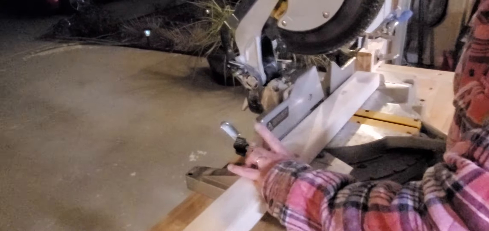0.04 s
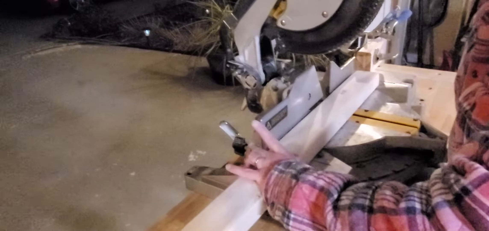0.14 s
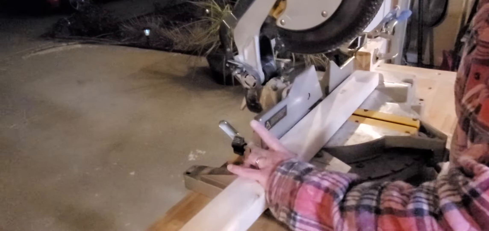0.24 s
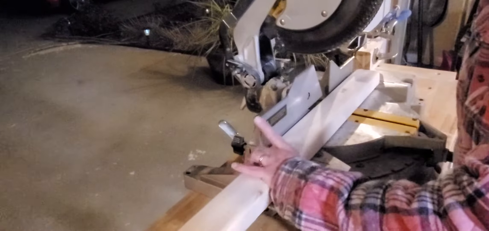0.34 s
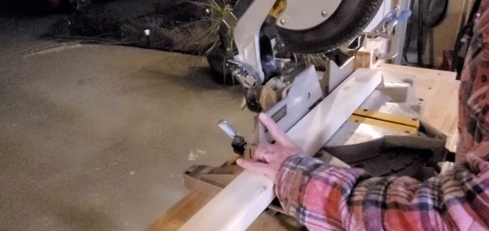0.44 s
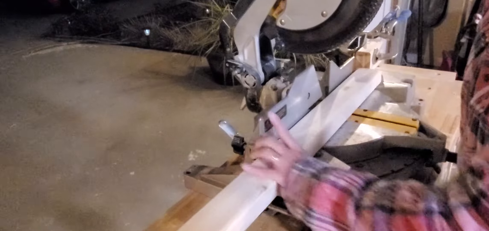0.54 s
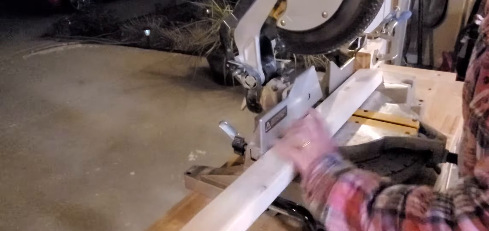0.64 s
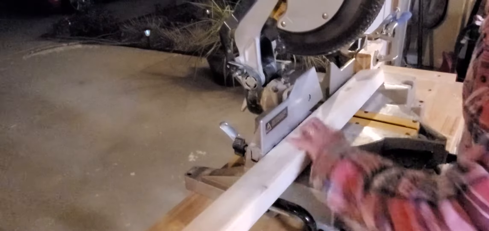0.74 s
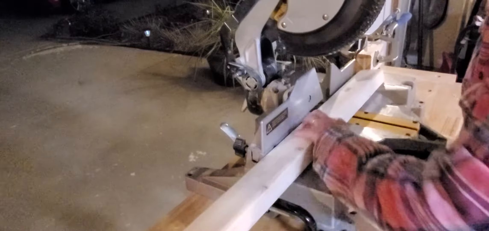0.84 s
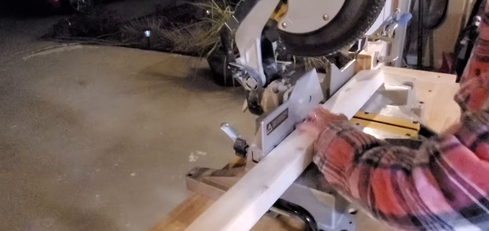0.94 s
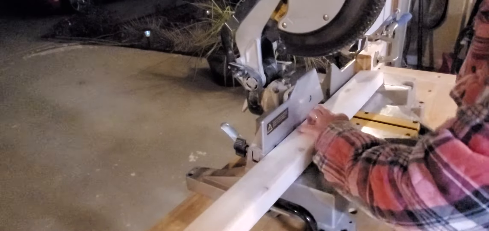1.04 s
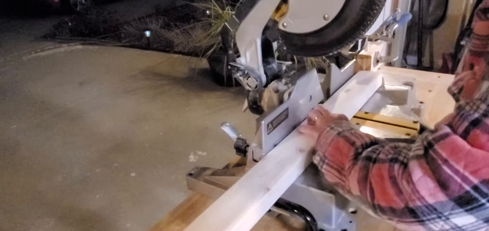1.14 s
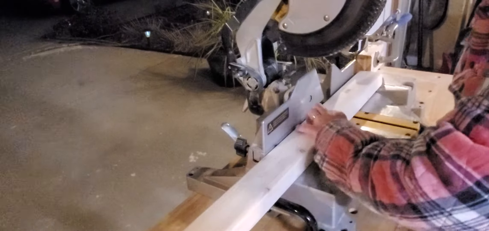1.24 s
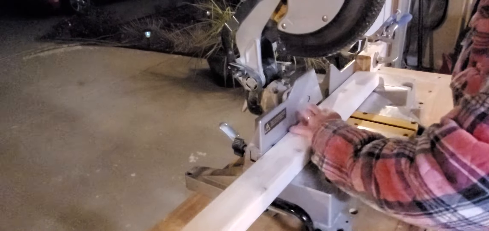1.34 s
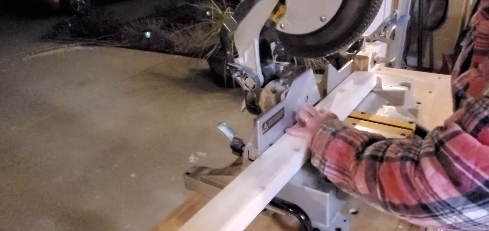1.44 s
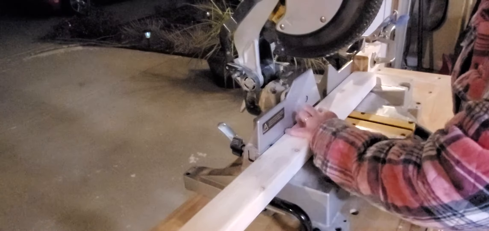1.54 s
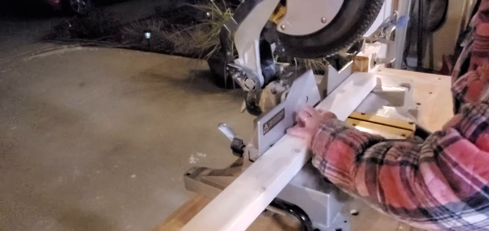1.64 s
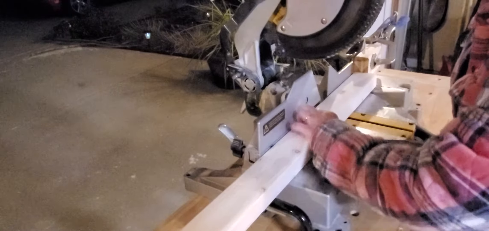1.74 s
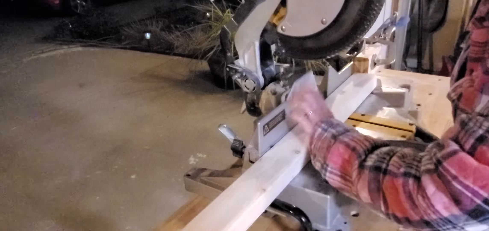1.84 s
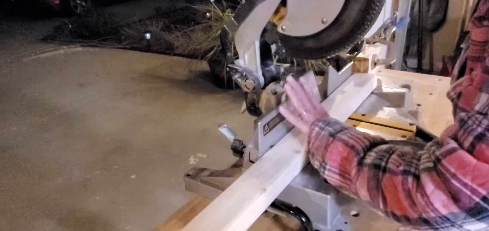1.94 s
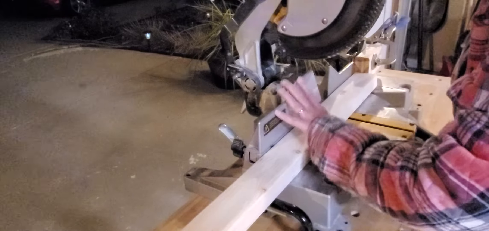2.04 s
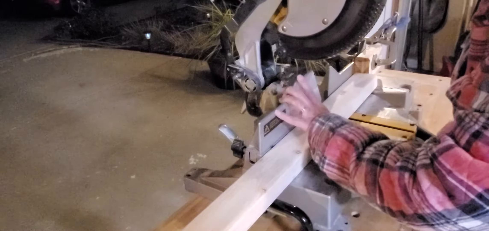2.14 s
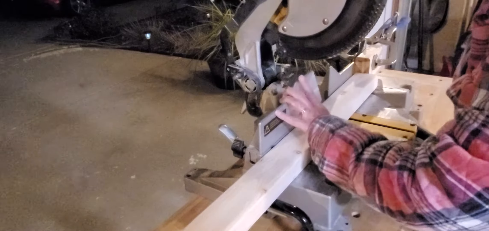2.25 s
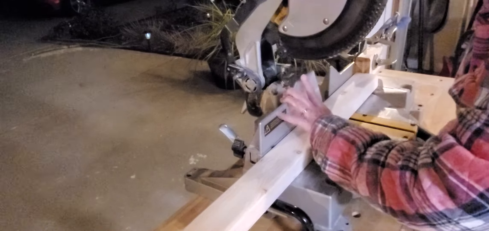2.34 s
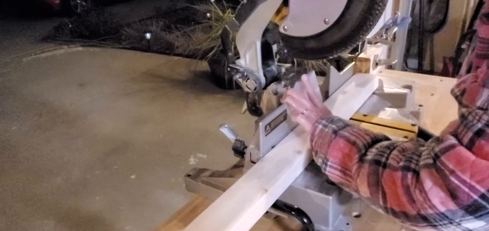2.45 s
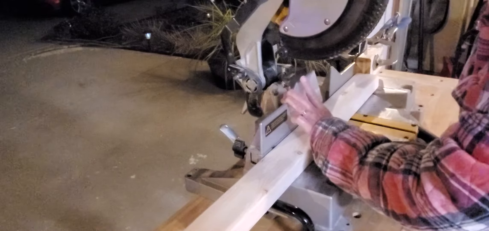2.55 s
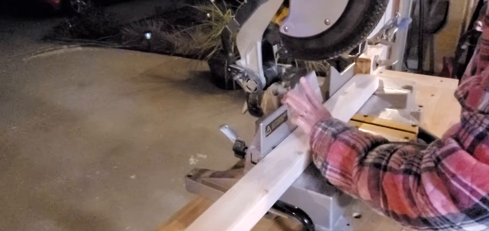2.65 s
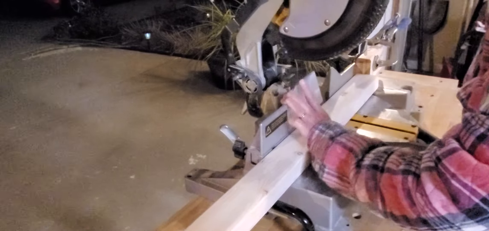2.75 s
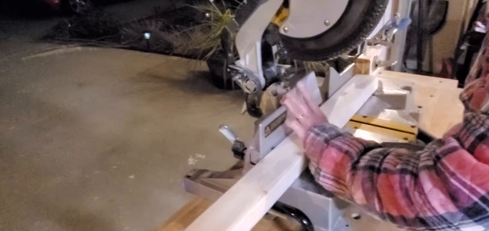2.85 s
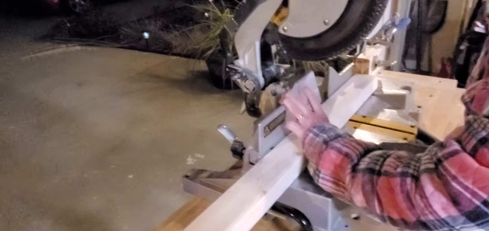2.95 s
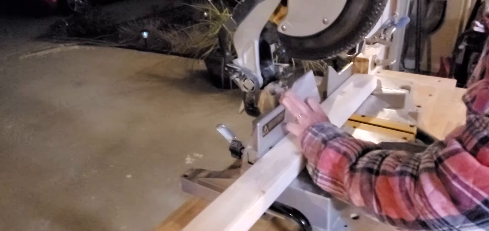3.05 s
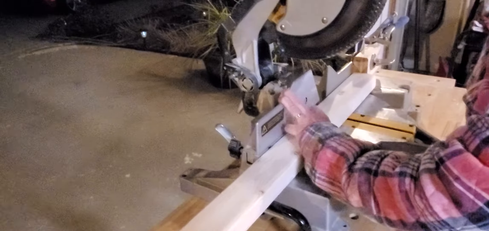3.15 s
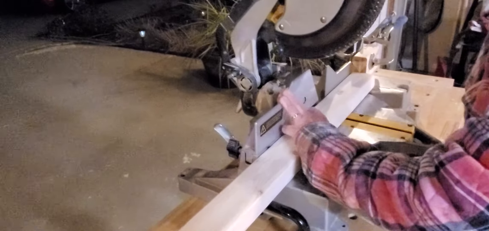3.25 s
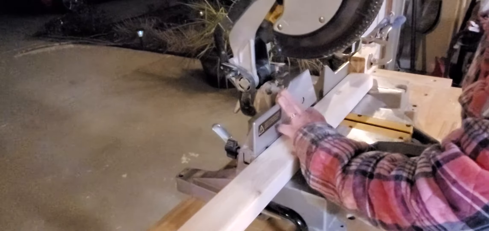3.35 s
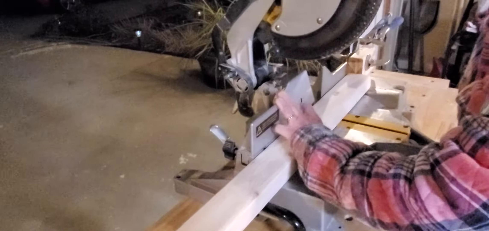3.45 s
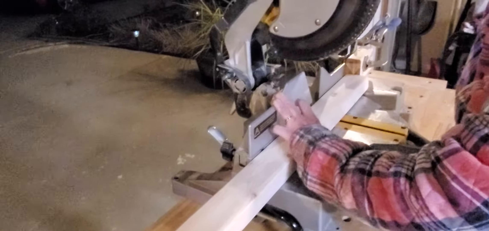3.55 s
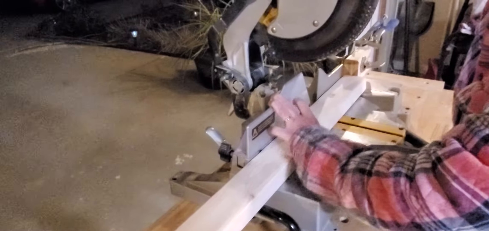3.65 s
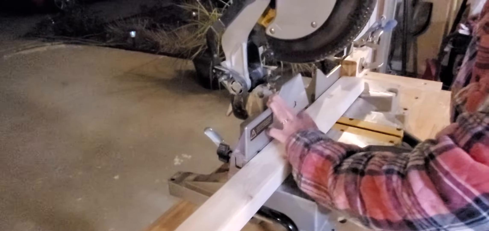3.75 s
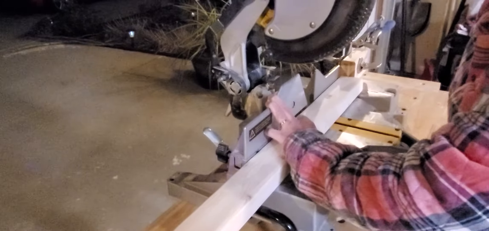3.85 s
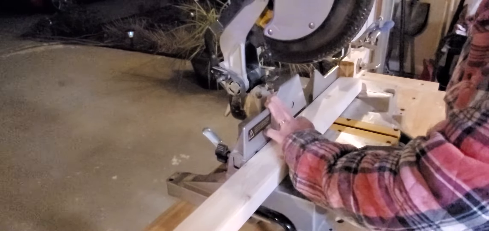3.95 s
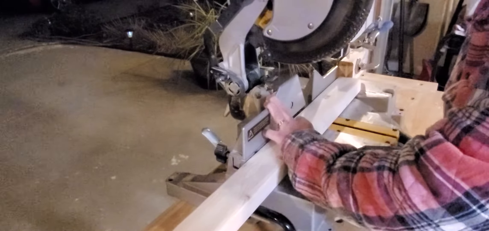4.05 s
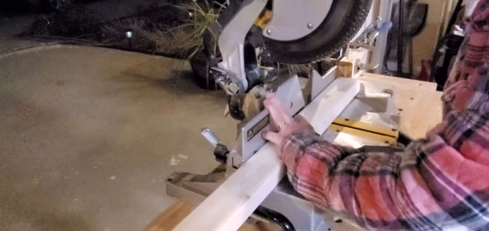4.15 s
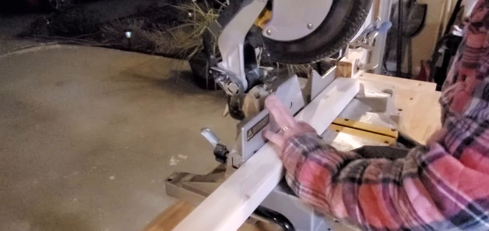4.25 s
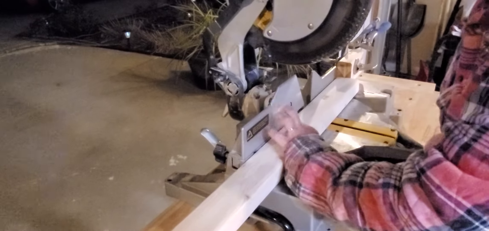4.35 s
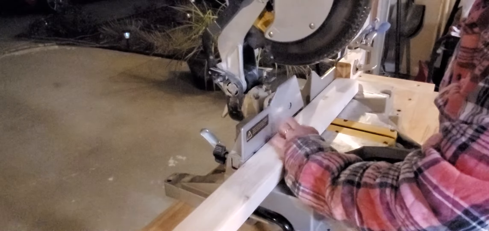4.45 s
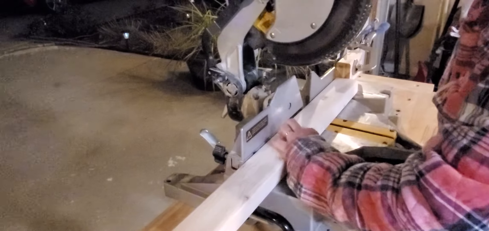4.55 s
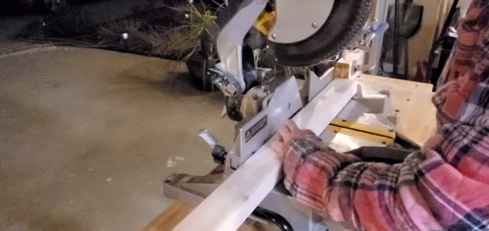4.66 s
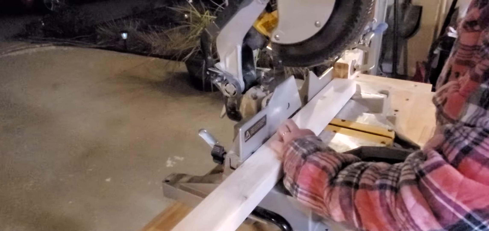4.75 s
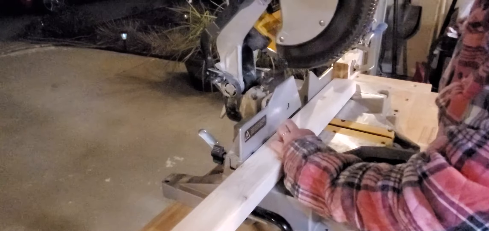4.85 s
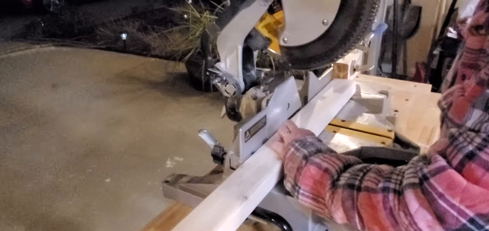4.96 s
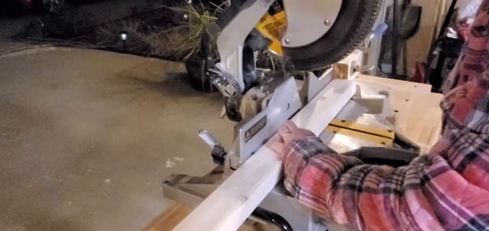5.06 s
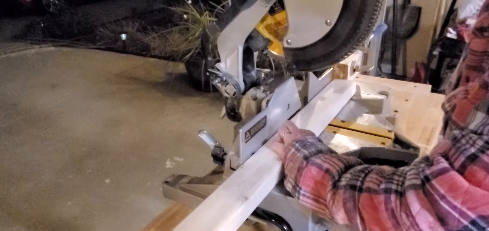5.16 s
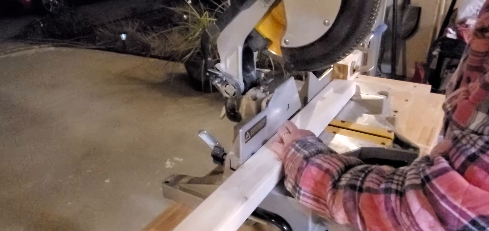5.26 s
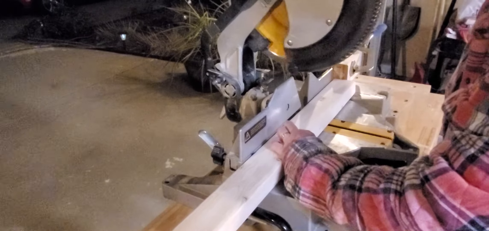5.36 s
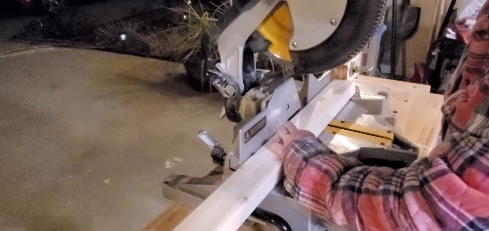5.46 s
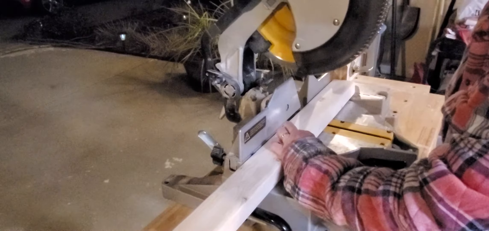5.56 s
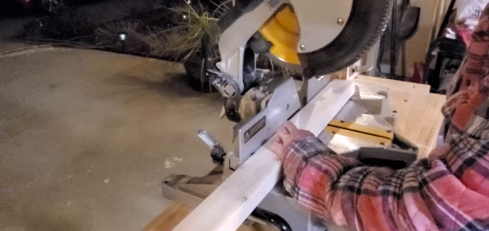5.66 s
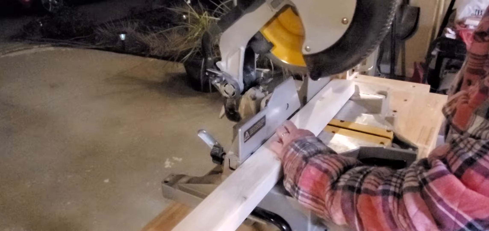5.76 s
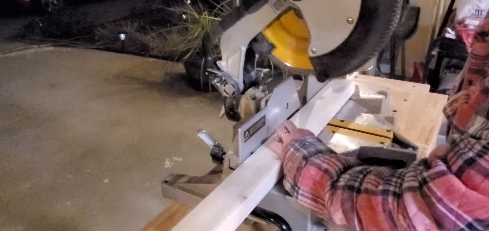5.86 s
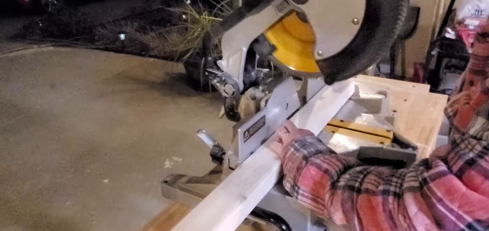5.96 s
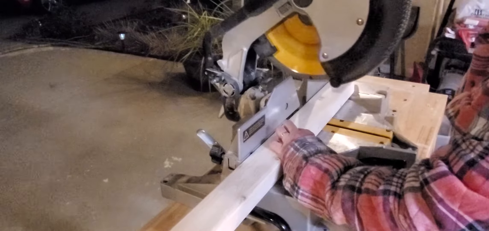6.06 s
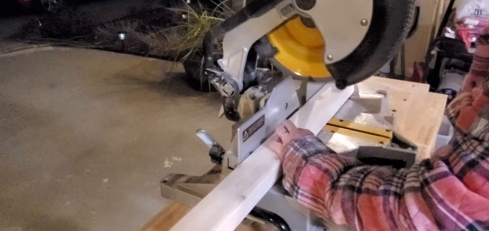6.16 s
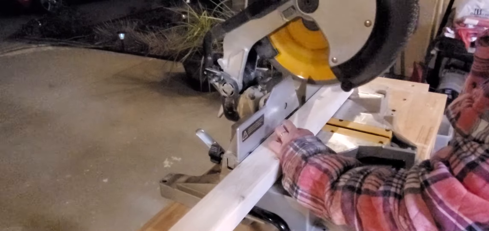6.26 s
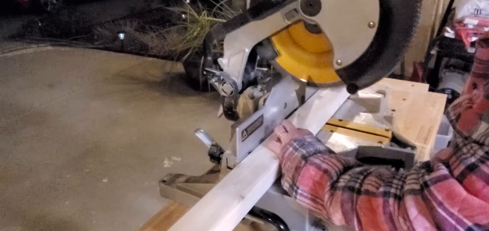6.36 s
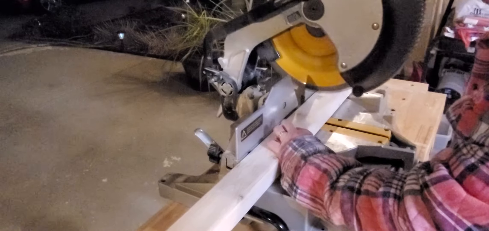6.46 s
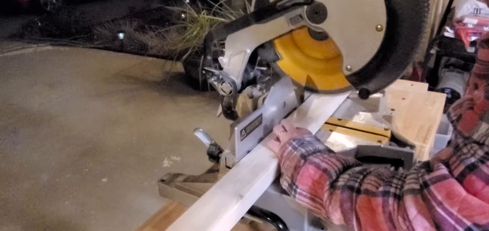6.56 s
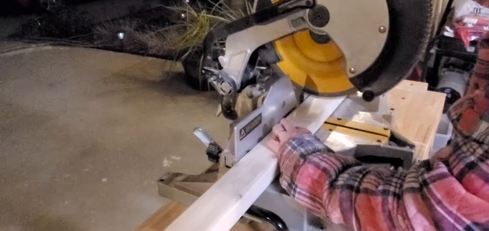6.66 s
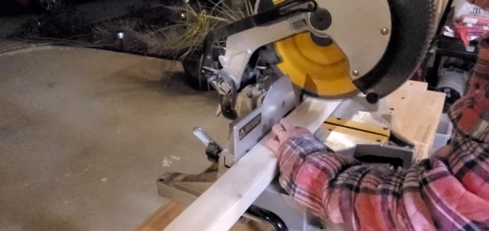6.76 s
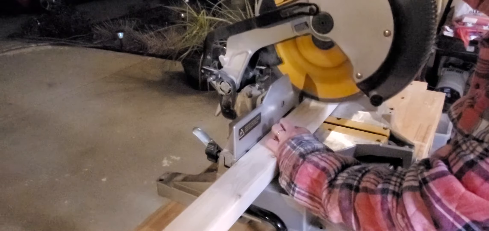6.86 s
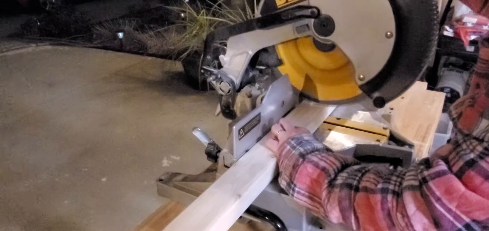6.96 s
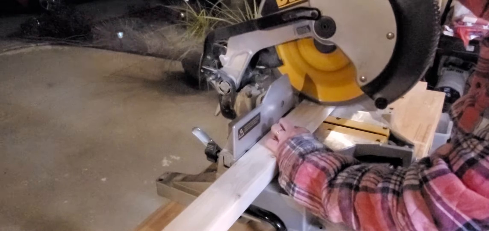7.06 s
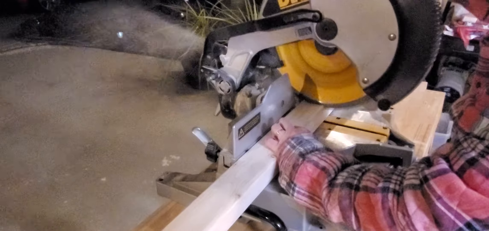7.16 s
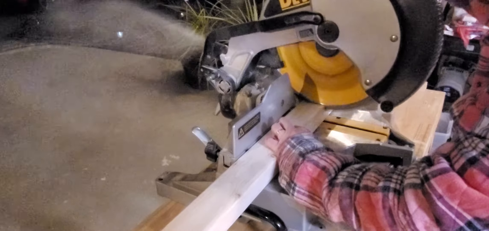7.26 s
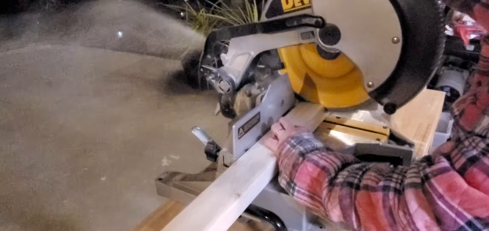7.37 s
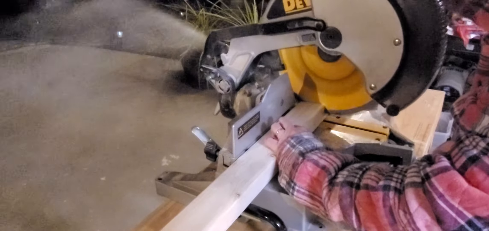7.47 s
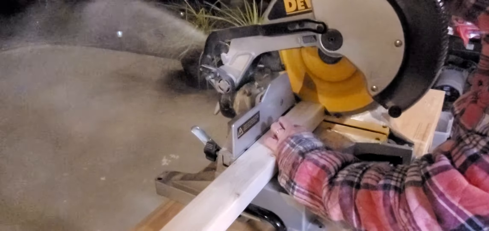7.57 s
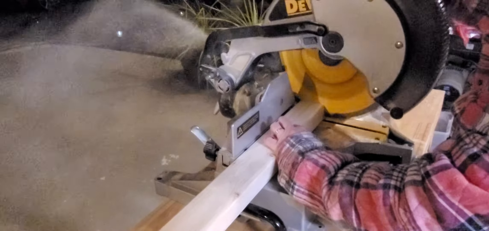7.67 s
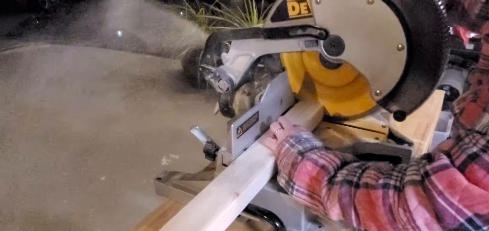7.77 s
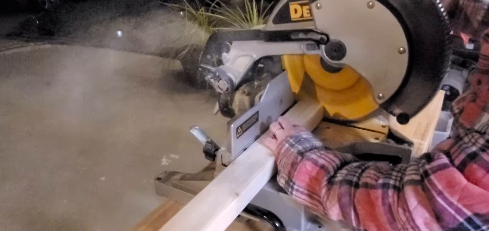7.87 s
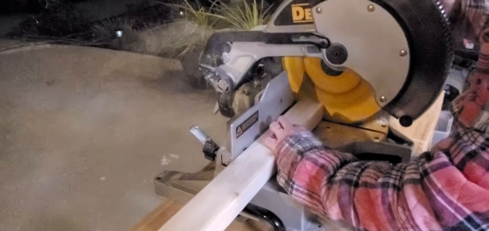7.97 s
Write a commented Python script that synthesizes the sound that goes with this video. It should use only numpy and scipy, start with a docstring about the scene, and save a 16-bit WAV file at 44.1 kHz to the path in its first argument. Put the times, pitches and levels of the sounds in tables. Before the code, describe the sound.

Close stereo sound in a small workshop: short woody squeaks, rumbling slides and a sharp cluster of board knocks, then faint ticks and soft rustles over low room tone. A distant blower comes on, and soon an electric saw starts abruptly with buzz and rattle, spins up to a high whine and strong rush, then sags under load as the blade slowly cuts, its bright tearing hiss leaning to the right.

```python
"""In a workshop, before two microphones, a board sticks and slips squeaking across a miter saw's table.
It rubs and knocks against fence and table, among clacks, ticks, bumps and rustles of noise and ringing modes.
A blower, muffled noise some way off, swells up; then the saw kicks in with mains buzz, rattle and sparks.
It spins up with a rising fan whine and a rush of air, then the teeth bite slowly into the wood:
strikes of noise ring the steel blade and the load drags down the motor's speed."""
import sys
import numpy as np
from scipy import signal
from scipy.fft import rfft, irfft
from scipy.io import wavfile

SR = 44100
rng = np.random.default_rng(int(sys.argv[2]) if len(sys.argv) > 2 else 0)


def transcribe(signal):
    """Save signal, clipped to [-1, 1], as a 16-bit WAV file at the path in sys.argv[1]."""
    frames = np.atleast_2d(signal).T
    limited = np.clip(frames, -1, 1)
    pcm = np.round(limited * 32767).astype(np.int16)
    wavfile.write(sys.argv[1], SR, pcm)


N = 354123
T = np.arange(N) / SR
FREQS = np.fft.rfftfreq(N, 1 / SR)


def undb(db):
    """Decibels to gain."""
    return 10 ** (np.asarray(db) / 20)


def unit(x):
    """Scale to rms 1."""
    return x / np.sqrt(np.mean(x ** 2) + 1e-20)


def gate(start, end, fade=0.012):
    """Open between two times, with short fades (in seconds) outside them."""
    return np.clip(1 + np.minimum(T - start, end - T) / fade, 0, 1)


def bell(x, centre, width):
    """A smooth hump of height 1, down to 1/e one width either side of its centre."""
    return np.exp(-((x - centre) / width) ** 2)


def fall(t, t60):
    """Exponential decay by 60 dB in t60 seconds."""
    return np.exp(-np.log(1000) * t / t60)


def envelope(start, rise_s, hold_s, t60):
    """Rise to 1 by the start time, hold, then die away."""
    rise = np.exp(-(np.maximum(start - T, 0) / rise_s) ** 2)
    return rise * fall(np.maximum(T - start - hold_s, 0), t60)


def by_hz(table, freqs=FREQS):
    """A (Hz, value) table joined on a log-frequency axis."""
    hz, value = np.transpose(table)
    return np.interp(np.log(freqs + 1), np.log(hz), value)


def colour(x, table):
    """Give a sound a (Hz, dB) spectrum that falls off beyond the table's ends; rms 1."""
    f = np.fft.rfftfreq(x.shape[-1], 1 / SR) + 1
    low_skirt = 1 + (table[0][0] / f / 1.1) ** 8
    high_skirt = 1 + (f / table[-1][0] / 1.1) ** 8
    response = undb(by_hz(table, f)) / np.sqrt(low_skirt * high_skirt)
    return unit(irfft(rfft(x) * response, x.shape[-1]))


def resonate(x, modes):
    """Pass a sound through (Hz, width Hz, dB) resonances; rms 1."""
    f = np.fft.rfftfreq(x.shape[-1], 1 / SR) + 1
    response = sum(undb(db) / (1 + 1j * (f * f - hz * hz) / (f * width)) for hz, width, db in modes)
    return unit(irfft(rfft(x) * response, x.shape[-1]))


# How alike diffuse sound is at the two microphones.
# Each row: frequency in Hz, left-right correlation (0-1).
LIKENESS = [(60, .99), (300, 1), (640, 1), (1400, 0.93), (3000, 0.083), (15000, 0.08)]


def noise(size=N):
    """Diffuse stereo noise: the bass is alike at both microphones, the treble nearly unrelated."""
    alike = np.clip(by_hz(LIKENESS, np.fft.rfftfreq(size, 1 / SR)), 0, 1)
    mid, side = rfft(rng.standard_normal((2, size))) * np.sqrt([1 + alike, 1 - alike])
    return unit(irfft(np.array([mid + side, mid - side]), size))


def walk(rate):
    """Smooth random wander with spread 1, slower than about the rate in Hz."""
    return unit(irfft(rfft(rng.standard_normal(N)) / (1 + (FREQS / rate) ** 4), N))


def turn(hz):
    """Phase in radians of a moving frequency."""
    return 2 * np.pi * np.cumsum(hz) / SR


def add(out, s, sound, db):
    """Mix in a short sound at a time in seconds and a peak level in dB."""
    i = int(s * SR)
    out[:, i:i + sound.shape[-1]] += undb(db) * sound / np.abs(sound).max()


def room(x, wet_db, t60=.5):
    """Direct sound plus the workshop's diffuse tail."""
    t = T[:SR // 2]
    tail = noise(size=len(t)) * fall(t, t60) * np.minimum(t / .012, 1)
    tail = unit(tail) / np.sqrt(len(t))
    return x + undb(wet_db) * signal.fftconvolve(x, tail, axes=1)[:, :N]


# Spectrum of the quiet workshop air. Each row: frequency in Hz, relative level in dB.
ROOM_TONE = [(15, -59), (25, -19.5), (64, -8), (123, -8.5), (152, -20), (241, -16), (333, -20.5),
             (461, -7.5), (620, -21), (812, -16.5), (1120, -28), (2090, -25.5), (2520, -38), (2970, -33),
             (15800, -43.5)]
# Faint hum in the room. Each row: frequency in Hz, mean amplitude in dB.
ROOM_HUM = [(118, -77), (236, -77), (467, -81)]
ROOM_DB = -66


def room_tone():
    """Quiet workshop air is coloured noise, with a faint hum of wavering sines."""
    hum = sum(undb(db + 2 * walk(3)) * np.sin(2 * np.pi * hz * T) for hz, db in ROOM_HUM)
    return colour(noise(), ROOM_TONE) * undb(ROOM_DB + 0.41 * walk(4.3)) + hum


# Muffled spectrum of the distant blower. Each row: frequency in Hz, relative level in dB.
BLOWER_COLOUR = [(71, -78), (120, -79), (237, -2), (316, -26), (445, 0), (555, -8), (681, 1.5), (754, -9),
                 (807, -1.5), (989, -11), (1620, -12.5), (2610, -34.5), (7000, -50), (9100, -94),
                 (15400, -120)]
BLOWER_ON_S, BLOWER_SPIN_UP_S = 4.29, 0.58
BLOWER_DB, BLOWER_SWELL_DB = -45, 12  # level at full speed, and its rise on the way there


def blower():
    """A muffled rush of air some way off swells as its fan gathers speed."""
    speed = np.clip((T - BLOWER_ON_S) / BLOWER_SPIN_UP_S, 0, 1)
    level_db = BLOWER_DB - BLOWER_SWELL_DB * (1 - speed) + walk(51)
    return colour(noise(), BLOWER_COLOUR) * undb(level_db) * gate(BLOWER_ON_S, T[-1])


# Soft brushing of board, hand and sleeve.
# Each row: middle in seconds, 1/e half-length in seconds, level in dB before the patchiness.
RUSTLES = [(0.288, 0.13, -71.5), (0.412, 0.061, -56.5), (0.542, 0.045, -58.5), (1.684, 0.039, -64.5),
           (2.036, 0.31, -72), (3.21, 0.065, -67), (4.277, 0.056, -61), (4.646, 0.045, -63.5)]


def rustles(patchy_db=3):
    """Skin and cloth swell and fade as they brush the wood."""
    swell = sum(undb(db) * bell(T, s, length) for s, length, db in RUSTLES)
    hiss = colour(noise(), [(1200, 3), (2600, -2), (4300, -8), (5500, -9.5),
                            (8500, -15), (11300, -6.5), (15000, -12.5)])
    return hiss * swell * undb(patchy_db * walk(50))


def taps(table, spectrum, t60, rise_s, gain_db):
    """Plain contacts: a noise burst with one colour and one decay."""
    out, t = np.zeros((2, N)), T[:SR // 3]
    for s, db in table:
        burst = colour(noise(size=len(t)), spectrum) * fall(t, t60) * np.minimum(t / rise_s, 1)
        add(out, s, burst, db + gain_db)
    return room(out, wet_db=-15, t60=0.44)


# Soft bumps on the stand. Each row: start in seconds, peak in dB before the common gain.
BUMPS = [(0.746, -32), (0.799, -41), (0.868, -35), (1.989, -51), (2.243, -39.5), (2.309, -51),
         (2.419, -49.5)]


def bumps():
    """Soft contacts on the stand start slowly and hold only bass."""
    spectrum = [(45, -30), (75, 0), (110, -18.0), (160, -18)]
    return taps(BUMPS, spectrum, t60=0.51, rise_s=0.011, gain_db=-7.0)


# Small sharp ticks of metal. Each row: start in seconds, peak in dB before the common gain.
TICKS = [(0.8496, -43.5), (1.1107, -47), (1.6788, -58), (1.9124, -48), (2.3887, -64.5), (2.5681, -64.5),
         (3.246, -43.5), (3.363, -62), (4.2894, -61), (4.3803, -51.5)]
# Bright spectrum of a tick. Each row: frequency in Hz, relative level in dB.
TICK_COLOUR = [(590, -56), (1000, -19), (1430, -12), (2060, -5), (2180, 2), (2590, 5), (4490, -13),
               (6560, -5), (7970, -15.5), (11400, -3.5), (15500, -37)]


def ticks():
    """Small metal contacts start almost at once and die quickly."""
    return taps(TICKS, TICK_COLOUR, t60=0.097, rise_s=0.00034, gain_db=7)


# Light clacks of the saw's arm, guard and clamp.
# Each row: start in seconds, peak in dB before the gain, body pitch in Hz, relative treble in dB.
CLACKS = [(0.85, -38.5, 1390, -13), (.919, -41.5, 1410, 2), (1.037, -47, 1460, 2),
          (1.087, -24.5, 1340, -18), (1.571, -53, 514, -28), (1.611, -35, 674, -39), (1.644, -38, 810, -30),
          (1.853, -45.5, 785, -11), (2.01, -37, 990, -31), (2.173, -41.5, 2080, -27),
          (2.192, -36, 1780, -28), (2.818, -43.5, 1420, -34), (2.847, -43.5, 2070, -32),
          (4.262, -36.5, 1600, -31), (4.364, -34, 1400, -20), (4.475, -43, 690, -33),
          (4.557, -41.5, 700, -30), (4.636, -47, 670, -7)]
# Resonances of the saw's arm. Each row: frequency in Hz, width in Hz, relative level in dB.
ARM = [(503, 36, 10), (674, 12.5, 13.5), (822, 54, 6.5), (1090, 66, 1), (1340, 57, -7), (1517, 27, -3),
       (1694, 20, -26), (2120, 38, -10), (2250, 61, -7)]


def clacks(gain_db=0, t60=0.11, body_db=-4, treble_db=-2, rise_s=0.0019):
    """Short contacts ring the saw's arm and the part that was touched."""
    out, t = np.zeros((2, N)), T[:SR // 4]
    band = signal.butter(8, [380, 2350], "band", fs=SR, output="sos")
    for s, db, hz, bright_db in CLACKS:
        burst = noise(size=len(t)) * fall(t, t60) * np.minimum(t / rise_s, 1)
        ring = resonate(burst, ARM) + undb(body_db) * resonate(burst, [(hz, 160, 0)])
        ring = signal.sosfilt(band, ring)
        edge = colour(burst, [(3000, 17.5), (5000, -6), (8000, -3), (11000, 2), (15000, -9)])
        add(out, s, ring + undb(bright_db + treble_db) * edge, db + gain_db)
    return room(out, wet_db=-7.5, t60=0.22)


# Shoves of the board along the table.
# Each row: end of the rise in seconds, hold in seconds, relative rumble in dB, relative scratch in dB.
SLIDES = [(0.66, 0.038, -52, -74), (0.776, 0.043, -49, -82), (0.874, 0.024, -50.5, -60),
          (1.075, .005, -58, -61), (1.359, 0.017, -45, -44), (1.442, 0.023, -50.5, -57.5)]
# The board's modes, also rung by the knocks.
# Each row: nominal frequency in Hz, relative level in dB, time to fall 60 dB in seconds.
BOARD = [(231, -3, .22), (262, -8, .2), (300, -8, .14), (345, -6, .1), (405, -1, .09), (470, -1, .08),
         (587, -7, .15), (760, -9, .08), (1017, -8, .12), (1238, -14, .12), (1405, -13, .14)]
SLIDE_RISE_S, SLIDE_T60_S = 0.037, 0.32


def slides(body_db=-3, scratch_db=-3, patchy_db=3):
    """Uneven friction rumbles in the board and scratches on its surface."""
    body = resonate(noise(), [(hz, 40, db) for hz, db, _ in BOARD[:6]])
    scratch = colour(noise(), [(700, -4), (1500, 11.0), (3000, 1),
                               (7000, -16), (11000, -11.5), (15000, -21)])
    out = np.zeros((2, N))
    for s, hold, low_db, high_db in SLIDES:
        friction = undb(low_db + body_db) * body + undb(high_db + scratch_db) * scratch
        out += envelope(s, SLIDE_RISE_S, hold, SLIDE_T60_S) * friction
    return out * undb(patchy_db * walk(40))


# Board against fence and table. Each row: start in seconds, peak in dB before the gain,
# relative hardness in dB, lift of the modes below 310 Hz in dB.
KNOCKS = [(0.671, -37.5, -27, 1), (0.757, -31.5, -44, 0), (0.836, -33.5, -32, -2), (1.091, -19, -15, -31),
          (1.102, -18, -30, -5.5), (1.142, -24, 1.5, 17), (1.386, -31, -5, 11), (3.82, -53.5, -12, 7),
          (4.507, -34.5, -11, 6)]


def knocks(gain_db=-1, crack_db=7, crack_t60=0.12):
    """Each blow rings the board's modes, the deep ones most when it lands flat; hard contact adds a crack."""
    out, t = np.zeros((2, N)), T[:SR // 2]
    for s, db, hard_db, deep_db in KNOCKS:
        detune = 1 + 0.016 * rng.standard_normal(len(BOARD))
        ring = np.zeros(len(t))
        for i, ((hz, mode_db, t60), shift) in enumerate(zip(BOARD, detune)):
            sign = (-1) ** i  # neighbouring modes start in opposite directions
            mode = np.sin(2 * np.pi * hz * shift * t) * fall(t, t60)
            ring += sign * undb(mode_db + deep_db * (hz < 310)) * mode
        crack = colour(noise(size=len(t)), [(300, 27), (1400, 4.5), (3000, 6), (6000, -15)])
        crack = crack * fall(t, crack_t60)
        blow = (ring + undb(hard_db + crack_db) * crack) * np.minimum(t / 0.0034, 1)
        add(out, s, blow, db + gain_db)
    return room(out, wet_db=-6.5, t60=0.4)


# Pushes that make the board squeak on the table.
# Each row: end of the rise in seconds, hold in seconds, mean pitch in Hz, level in dB before the judder,
# overtones in dB before the edge gain, judder depth (0-1).
SQUEAKS = [(0.012, 0.046, 512, -29.5, -24, 0.83), (0.103, 0.04, 496.4, -36, -39, 0.28),
           (0.409, 0.075, 480.7, -18.5, -19.5, 0.1), (0.481, 0.0027, 474, -21.5, -10.5, 0.01),
           (.524, .003, 486.4, -29.5, -20, .3), (1.924, 0.0053, 494.4, -38.5, -16, 0.2)]
# Spectrum of the grit in each slip. Each row: frequency in Hz, relative level in dB.
SQUEAK_GRIT = [(700, 1), (1100, 0.5), (2000, -12), (3300, -12.5), (5000, -30.5), (7500, -19.5), (9000, -27),
               (11500, -17), (15000, -44)]
# Overtones of the squeak. Each row: multiple of the pitch, mean relative level in dB.
OVERTONES = [(2, 0), (3, -6), (4, -11), (5, -20), (6, -22), (7, -20)]
SQUEAK_RISE_S, SQUEAK_T60_S = 0.03, 0.069  # a long push builds up over the full rise
JUDDER_HZ = 21  # stick-slip throb


def squeaks(edge_db=1.5, grit_db=-8, jerk_rise_s=0.013):
    """The board sticks and slips at its own resonance; each push has its own judder and overtone strength."""
    pushes = []
    for s, hold, _, db, _, judder in SQUEAKS:
        rise_s = min(jerk_rise_s + hold, SQUEAK_RISE_S)
        throb = 1 - min(judder, 1) * np.sin(np.pi * JUDDER_HZ * (T - s)) ** 2
        pushes.append(undb(db) * envelope(s, rise_s, hold, SQUEAK_T60_S) * throb)
    pushes = np.array(pushes) + 1e-12
    _, _, pitches, _, overtone_db, _ = np.transpose(SQUEAKS)
    pressure = pushes.sum(axis=0)
    pitch = pitches @ pushes / pressure  # the mean of the pushes' pitches, weighted by their strength
    phase = turn(pitch * (1 + .008 * walk(60)))
    overtones = unit(sum(undb(db + 3 * walk(35)) * np.sin(k * phase) for k, db in OVERTONES))
    grit = colour(noise(), SQUEAK_GRIT) * (1 + np.cos(phase)) / 2
    slips = overtones + undb(min(grit_db, 0)) * grit
    out = pressure * np.sqrt(2) * np.sin(phase) + undb(overtone_db + edge_db) @ pushes * slips
    return room(out, wet_db=-13.5, t60=0.3)


SWITCH_ON_S = 5.222
# Resonances of the saw's stand. Each row: frequency in Hz, width in Hz, relative level in dB.
STAND = [(72, 14, -13), (98, 15, 5)]


def shudder(level_db=-46, after_s=0.78, length_s=0.3):
    """The accelerating blade shakes the stand, less as the speed levels off."""
    swell = bell(T, SWITCH_ON_S + after_s, length_s) * gate(SWITCH_ON_S, T[-1])
    return undb(level_db) * resonate(noise(), STAND) * swell


MAINS_HZ = 60
INRUSH_RISE_S, INRUSH_HOLD_S = 0.01, 0.2  # the surge of current into the standing motor
# Harmonics of the buzz. Each row: multiple of twice the mains, relative level in dB.
BUZZ = [(1, -21.5), (2, -19), (3, -17), (4, 3.5), (5, -4.5), (6, -5.5), (7, -6), (8, -15), (9, -14),
        (10, -13), (11, -7.5)]
# Spectrum of the gear rattle. Each row: frequency in Hz, relative level in dB.
RATTLE_COLOUR = [(59, -48), (100, -19), (176, -27.5), (388, -8.5), (460, -10), (534, -12), (695, -4.5),
                 (940, -11.5), (1160, -3.5), (1780, -8.5), (1890, -10.5), (2910, -23), (3200, -24),
                 (4240, -24), (9000, -26), (11700, -63), (19800, -120)]
# Spectrum of the brush sparks. Each row: frequency in Hz, relative level in dB.
SPARK_COLOUR = [(1760, -37), (3000, 2), (4130, -4), (5890, -3.5), (7940, -7), (10600, 2), (12000, -1.5),
                (13100, -0.5), (15800, -1.5)]
# Resonances of the jolted blade. Each row: frequency in Hz, width in Hz, relative level in dB.
START_RING = [(2790, 26, 10), (12650, 150, 3.5), (13200, 70, -13), (14850, 150, -8), (15600, 160, -12)]


def motor_start(buzz_db=-17.5, buzz_t60=0.2, jolt_db=8, jolt_s=0.0063,
                rattle_db=-21.0, rattle_t60=0.64, backlash_db=9, backlash_s=0.053,
                spark_db=-23.0, spark_t60=0.26, spark_linger_s=0.023,
                flash_db=7.5, flash_after_s=0.044, flash_s=.028,
                throb=0.17, ring_db=-2, ring_t60=0.74, hum_db=-42, hum_t60=7):
    """Inrush current shakes the motor on every half wave of the mains: buzz, gear rattle and brush sparks."""
    phase = turn(2 * MAINS_HZ * (1 + 0.0018 * walk(12.3)))
    buzz = unit(sum(undb(db) * np.sin(k * phase + rng.uniform(0, 2 * np.pi))
                    for k, (_, db) in enumerate(BUZZ, 1)))
    torque = unit(1 + throb * np.cos(phase))
    rattle = colour(noise() * torque, RATTLE_COLOUR)
    flash_at_s = SWITCH_ON_S + flash_after_s
    ring = resonate(noise(), START_RING) * envelope(flash_at_s, flash_s, 0, ring_t60)
    sparks = colour(noise() * torque, SPARK_COLOUR) + undb(ring_db) * ring
    # the first jolt slams the gears through their backlash; the brushes flash just after it
    buzz = buzz * undb(buzz_db + jolt_db * bell(T, SWITCH_ON_S, jolt_s))
    rattle = rattle * undb(rattle_db + backlash_db * bell(T, SWITCH_ON_S, backlash_s))
    sparks = sparks * undb(spark_db + flash_db * bell(T, flash_at_s, flash_s) + 1.5 * walk(47))
    # the hum outlasts the buzz and dies away slowly
    hum = undb(hum_db) * (np.sin(phase) + 2.04 * np.sin(2 * phase))
    layers = [(buzz, 0, buzz_t60), (rattle, 0, rattle_t60),
              (sparks, spark_linger_s, spark_t60), (hum, 0, hum_t60)]
    return sum(x * envelope(SWITCH_ON_S, INRUSH_RISE_S, INRUSH_HOLD_S + linger, t60)
               for x, linger, t60 in layers)


CUT_START_S = 6.982  # the teeth first meet the wood
LOAD_SAG, SINK_S = .14, .48  # share of speed lost in the full cut; time scale of the blade sinking in


def time_in_cut():
    """Seconds since the teeth met the wood."""
    return np.maximum(T - CUT_START_S, 0)


def load():
    """Load on the motor, 0-1, as the blade sinks into the board."""
    return 1 - bell(time_in_cut(), 0, SINK_S)


# free fan blade rate in Hz, notional standstill in seconds, time constant in seconds
FREE_HZ, SPIN_FROM_S, SPIN_UP_S = 3348, 5.1255, .63


def fan_rate():
    """The motor closes in on its free speed, and the load drags it back."""
    free = FREE_HZ * (1 - np.exp((SPIN_FROM_S - np.maximum(T, SWITCH_ON_S)) / SPIN_UP_S))
    return free * (1 - LOAD_SAG * load())


FULL_RUSH_HZ = 2810  # fan rate above which the rush gets no louder
# Spectrum of the housing roar. Each row: frequency in Hz, relative level in dB.
ROAR_COLOUR = [(40, -44), (70, -20), (100, -16.5), (170, -22.5), (238, 3.5), (313, -6.5), (390, 2.5),
               (463, -5.5), (505, 1.5), (687, -0.5), (904, -4.5), (1130, -5.5), (1540, -0.5), (1820, -8),
               (2400, -6)]
# Resonances of the housing. Each row: frequency in Hz, width in Hz, relative level in dB.
HOUSING = [(235, 18.3, -4.5), (349, 35, -20), (503, 34, -0.5), (700, 64, -4.5), (1135, 48, -1),
           (1525, 36, -14)]
# Spectrum of the air rush before its tilt. Each row: frequency in Hz, relative level in dB.
AIR_COLOUR = [(1060, -69), (1800, -12), (2360, -11), (2500, -10.5), (2840, -1.5), (3020, 2.5), (3790, -1.5),
              (4980, 0.5), (5310, -5), (5810, -0.5), (6850, -5), (7360, -1.5), (8440, -7), (11300, -3.5),
              (15800, -15)]
# full level in dB, growth with speed, drop in heard level from the cut's start on, its time constant
ROAR_DB, ROAR_DB_PER_OCT, ROAR_DROP_DB, ROAR_DROP_S = -24.5, 10, 14, 0.18
AIR_DB, AIR_DB_PER_OCT, AIR_DROP_DB, AIR_DROP_S = -19, 21, 18, 0.29


def air_rush(fan_hz, phase, housing_db=-7, shake_db=-15, tilt_db=5, flutter_db=1.26):
    """Fan and blade churn air through the housing, louder with speed; it is heard lower once the cut begins."""
    growth = np.minimum(np.log2(fan_hz / FULL_RUSH_HZ), 0)
    roar_drop = ROAR_DROP_DB * (1 - np.exp(-time_in_cut() / ROAR_DROP_S))
    air_drop = AIR_DROP_DB * (1 - np.exp(-time_in_cut() / AIR_DROP_S))
    # the rotor's unbalance hums once and twice a turn, far below the fan's whine
    shake = unit(np.sin(phase / 8) + np.sin(phase / 4))
    roar = colour(noise(), ROAR_COLOUR) + undb(housing_db) * resonate(noise(), HOUSING)
    roar = roar + undb(shake_db + 1.9 * walk(36)) * shake
    air = colour(noise(), AIR_COLOUR)
    # slow air hisses less in the top octave
    top = signal.sosfilt(signal.butter(1, 7000, "high", fs=SR, output="sos"), air)
    air = air + (undb(tilt_db * np.log2(fan_hz / 2950)) - 1) * top
    roar = undb(ROAR_DB + ROAR_DB_PER_OCT * growth - roar_drop) * roar
    air = undb(AIR_DB + AIR_DB_PER_OCT * growth - air_drop) * air
    rush = (roar + air) * undb(flutter_db * walk(32))
    # reflections from table and walls comb the rush into fine fixed peaks
    return room(rush, wet_db=-3.0, t60=0.15)


# Whistle of the guard. Each row: frequency in Hz, width in Hz, relative level in dB.
GUARD = [(3200, 120, 0)]


def guard_whistle(fan_hz, whistle_db=-29):
    """The guard whistles only while the air passes at the right speed."""
    return undb(whistle_db) * resonate(noise(), GUARD) * bell(fan_hz, 2570, 190)


# Duct resonances that lift the whine as it sweeps through.
# Each row: fan rate in Hz, 1/e half-width in Hz, lift in dB.
DUCT = [(1640, 80, 11), (2430, 70, 6), (2890, 90, 3), (3175, 80, 4.5)]
WHINE_DB, WHINE_DB_PER_OCT, WHINE_DIP_DB = -30.5, 15, 18  # level at full rush, growth, dip under load


def fan_whine(fan_hz, phase, choke_load=0.24):
    """Fan blades sound a tone at their passing rate; ducts lift it and its level dips under load."""
    steady = np.interp(fan_hz, [2600, 3120], [.4, 3.5])

    def partial(multiple):
        """A tone of the rotor that fades at random, differently at each microphone."""
        fading = np.array([walk(30) + 1j * walk(30) + steady for _ in range(2)])
        return unit(np.real(fading * np.exp(1j * multiple * phase)))

    growth_db = WHINE_DB_PER_OCT * np.log2(fan_hz / FULL_RUSH_HZ)
    dip_db = WHINE_DIP_DB * np.minimum(load() / choke_load, 1) ** 2
    duct_db = sum(db * bell(fan_hz, hz, width) for hz, width, db in DUCT)
    whine = partial(1) + undb(-18) * partial(1 / 2) + undb(-16) * partial(2)
    return undb(WHINE_DB + growth_db - dip_db + duct_db) * whine


def running_saw():
    """One rotor drives the rush of air, the guard's whistle and the fan whine."""
    fan_hz = fan_rate()
    # the tone is ragged while the rotor gathers speed and steadies near full speed
    ragged = np.interp(fan_hz, [2000, 2800, 3100], [.014, .004, .0015])
    phase = turn(fan_hz * (1 + ragged * walk(87.6)))
    saw = air_rush(fan_hz, phase) + guard_whistle(fan_hz) + fan_whine(fan_hz, phase)
    return saw * gate(5.25, T[-1], fade=0.034)


# High modes of the steel blade. Each row: frequency in Hz, relative level in dB.
BLADE = [(9146, -47), (9464, -49), (9873, -47), (10126, -46), (10546, -46), (10750, -44), (11009, -42),
         (11149, -43), (11364, -42), (11493, -46), (11693, -47), (12112, -47), (12209, -44), (12371, -46),
         (12597, -48), (12915, -52), (13243, -46), (13517, -48), (13744, -47), (13970, -43), (14277, -48),
         (14653, -46), (14906, -49), (15418, -49)]
# Low modes of the steel blade. Each row: frequency in Hz, relative level in dB.
BLADE_LOW = [(3590, -12), (4170, -0.5), (5157, 5), (5610, 2), (6060, 1.5), (6363, 5.5), (6620, -1),
             (7214, -5), (8120, -42)]
# Spectrum of the flying chips. Each row: frequency in Hz, relative level in dB.
CHIP_COLOUR = [(5000, -11.5), (7300, 3.5), (8300, -7.5), (9100, 0), (11200, -0.5), (13000, 3.5), (15600, 7)]
# The teeth catch harder for a moment.
# Each row: middle in seconds, 1/e half-length in seconds, extra level in dB.
CATCHES = [(7.01, 0.026, 2.5), (7.358, 0.2, 3.5)]
CUT_DB, CUT_FADE_DB_PER_S = -19, 4.2


def cutting(ring_db=0, low_ring_db=-12, chip_db=-4, tooth_db=-21, wobble=0.075,
            width_hz=42, low_width_hz=65, grain_db=0.54, splinter_db=0.5):
    """Teeth strike the wood with uneven force, ring the steel plate and throw off chips."""
    catch_db = sum(extra_db * bell(T, s, length) for s, length, extra_db in CATCHES)
    level_db = CUT_DB - CUT_FADE_DB_PER_S * time_in_cut() + catch_db
    shaft = turn(fan_rate() / 40)
    teeth = 60 * shaft
    # the blade runs slightly out of true and rubs harder once a turn; fibres tear one by one
    grain = undb(grain_db * walk(23) + splinter_db * walk(650))
    force = unit((1 + wobble * np.sin(shaft)) * grain)
    strikes = noise() * force * (1 + np.cos(teeth))
    # the kerf damps the plate's low modes most
    high_ring = resonate(strikes, [(hz, width_hz, db) for hz, db in BLADE])
    low_ring = resonate(strikes, [(hz, low_width_hz, db) for hz, db in BLADE_LOW])
    ring = undb(ring_db) * high_ring + undb(low_ring_db) * low_ring
    chips = undb(chip_db) * colour(noise() * force, CHIP_COLOUR)
    # the tooth rate and its octave waver separately at each microphone
    tone = unit(np.array([.5 * walk(6.7) * np.sin(teeth) + walk(30) * np.sin(2 * teeth)
                          for _ in range(2)]))
    return (ring + chips + undb(tooth_db) * tone) * undb(level_db) * gate(CUT_START_S, T[-1])


# The saw's balance between the microphones. Each row: frequency in Hz, left minus right in dB.
SAW_PAN = [(200, -0.5), (700, -0.4), (1290, 3.5), (2380, -3), (4400, -1), (8500, -7.5), (15000, -5.5)]


def beam(saw):
    """The saw's treble beams to the right; the two channels' mean power gain stays 1."""
    pan = undb(np.outer([1, -1], by_hz(SAW_PAN)) / 2)
    return irfft(rfft(saw) * pan / np.sqrt(np.mean(pan ** 2, axis=0)), N)


def scene():
    """Workshop air and blower behind the board handling, then the saw."""
    handling = rustles() + bumps() + ticks() + clacks() + slides() + knocks() + squeaks()
    saw = beam(running_saw() + cutting())
    return room_tone() + blower() + handling + shudder() + motor_start() + saw


PORT_LAG = 6  # extra travel to the left microphone, in samples
TOP_HZ = 15720


def record(dry):
    """Sound reaches the left microphone later; the recorder clips at full scale and cuts the top."""
    left = np.pad(dry[0], (PORT_LAG, 0))[:N]
    clipped = np.clip([left, dry[1]], -1, 1)
    return signal.sosfilt(signal.ellip(12, .2, 90, TOP_HZ, fs=SR, output="sos"), clipped)


dry = scene()
out = record(dry)
transcribe(out)
```